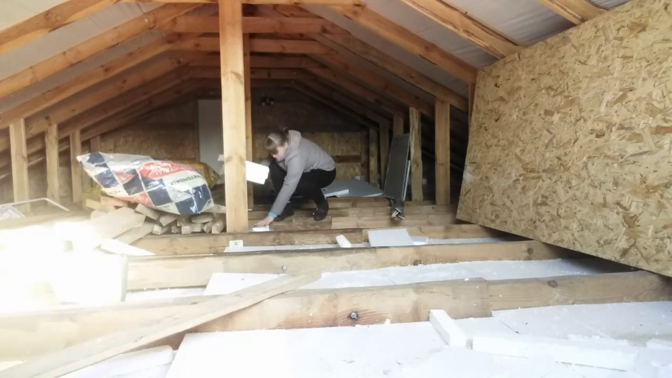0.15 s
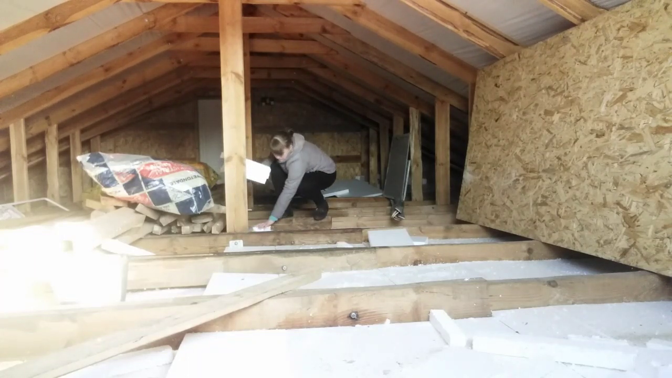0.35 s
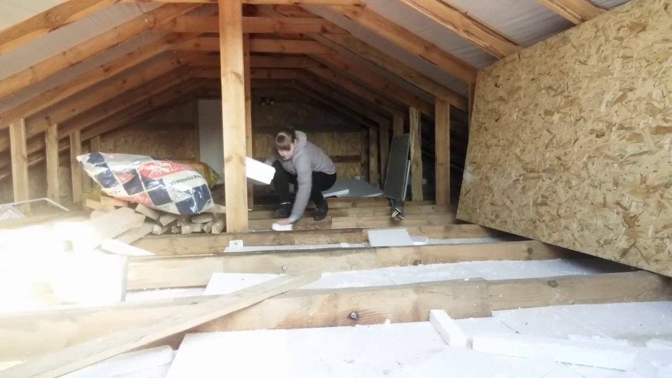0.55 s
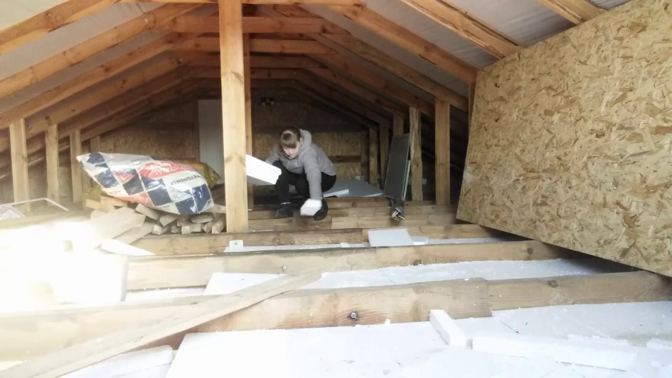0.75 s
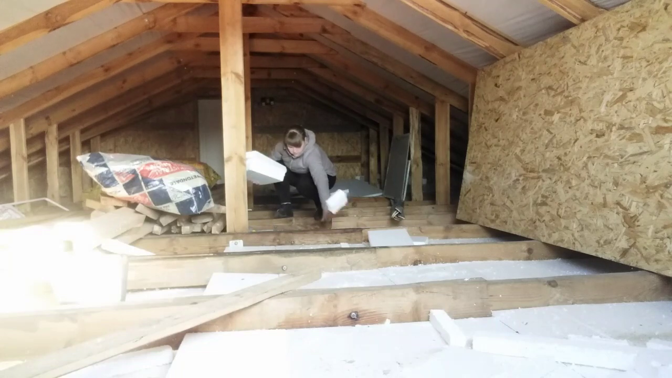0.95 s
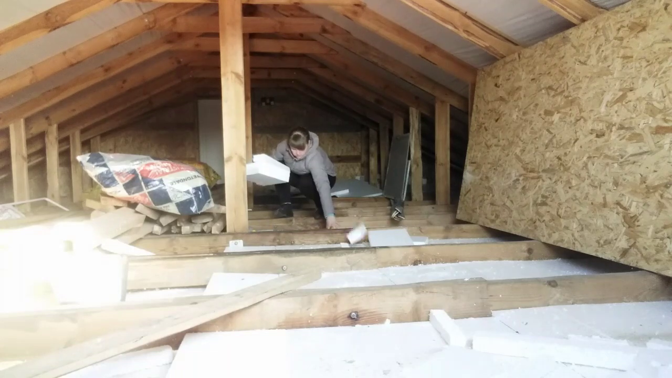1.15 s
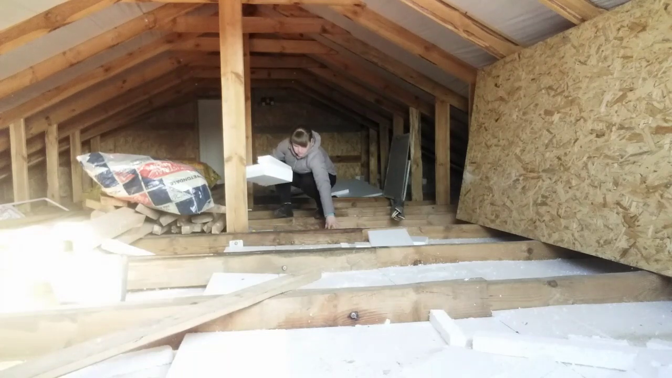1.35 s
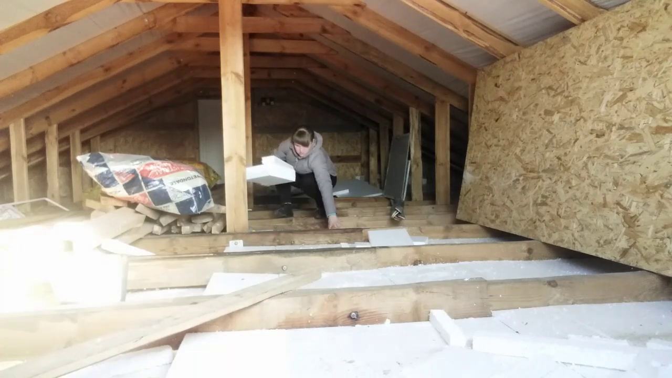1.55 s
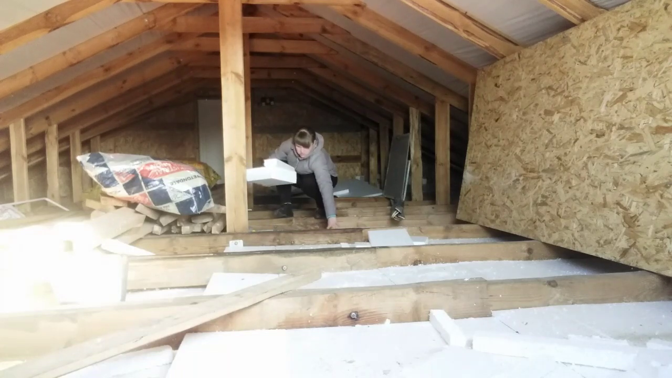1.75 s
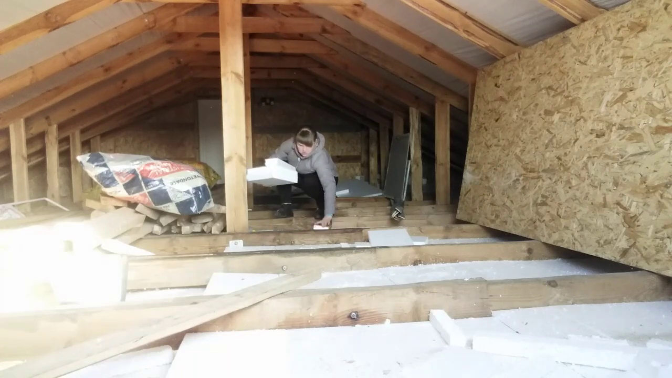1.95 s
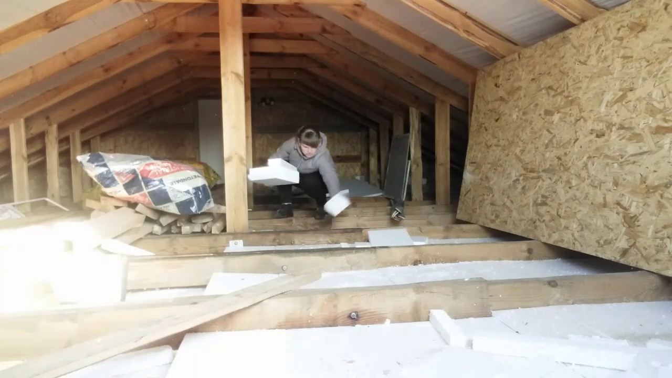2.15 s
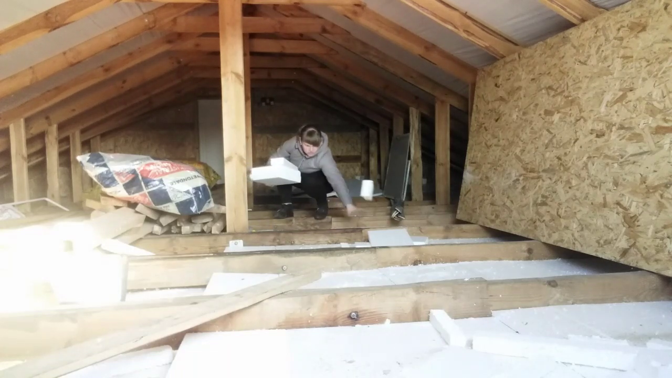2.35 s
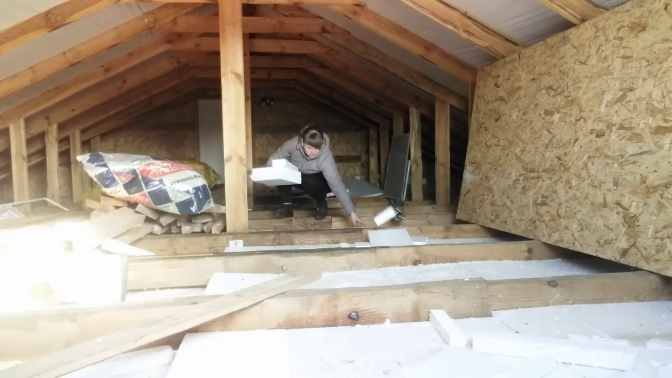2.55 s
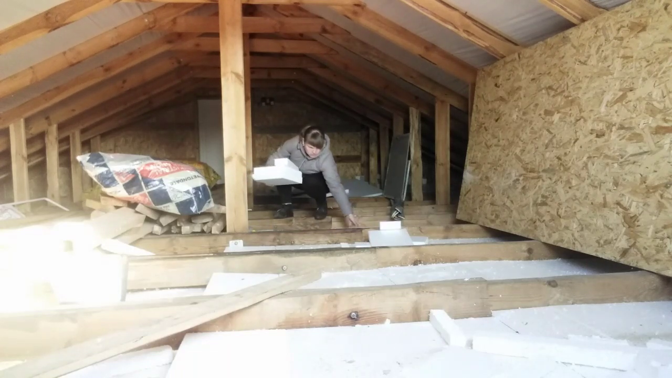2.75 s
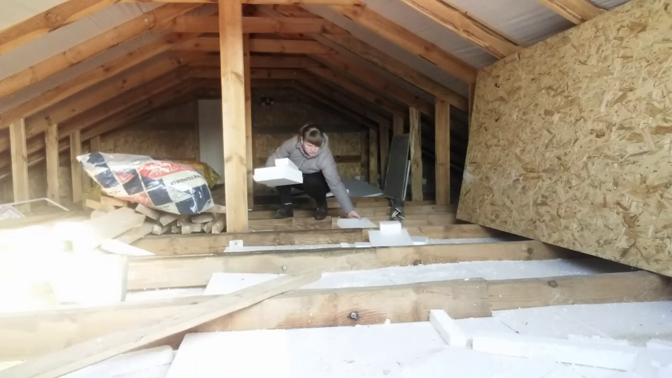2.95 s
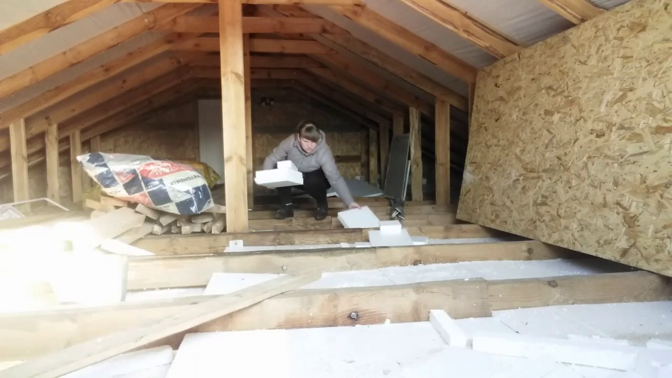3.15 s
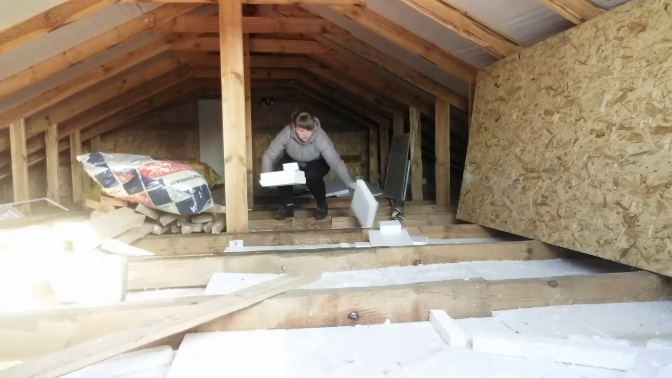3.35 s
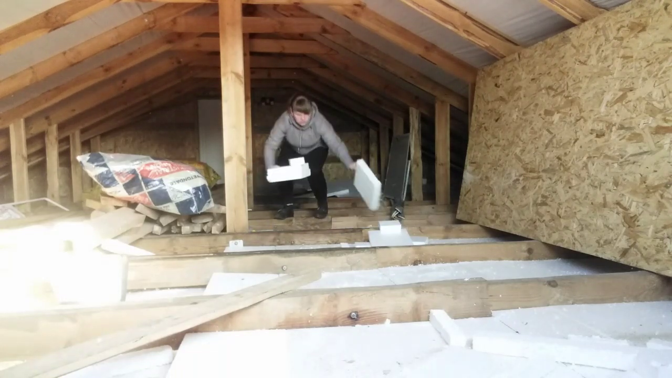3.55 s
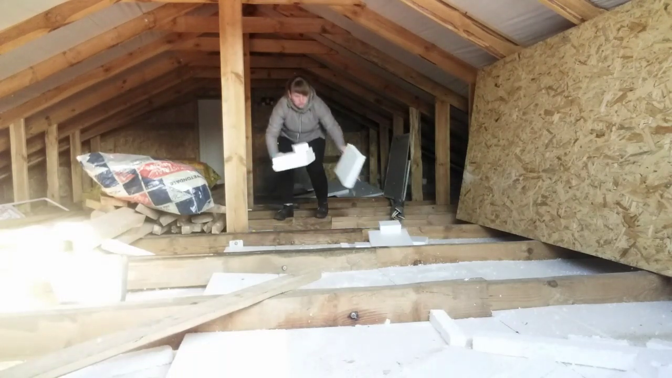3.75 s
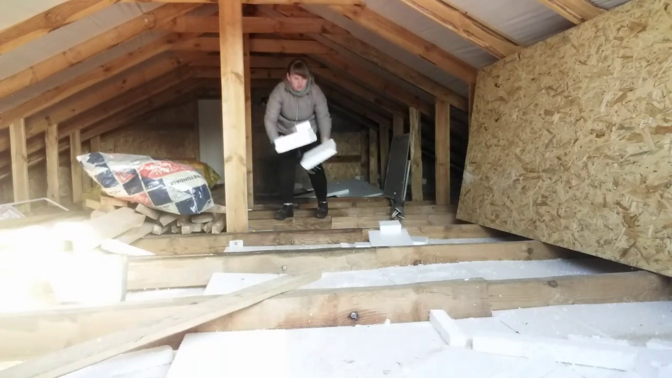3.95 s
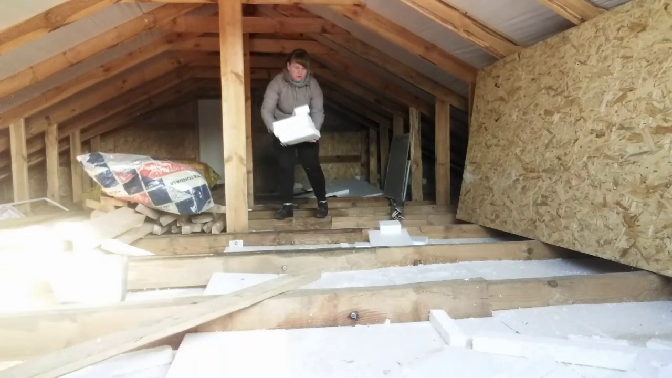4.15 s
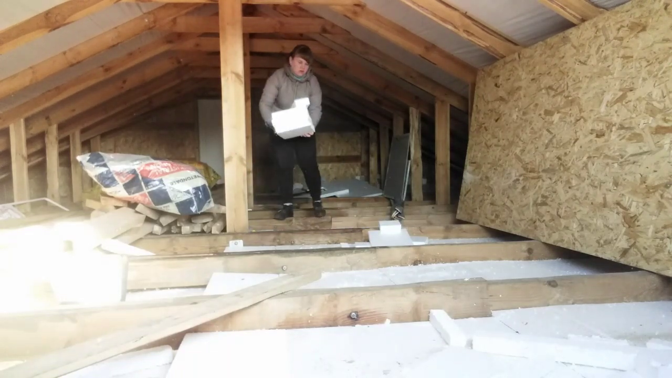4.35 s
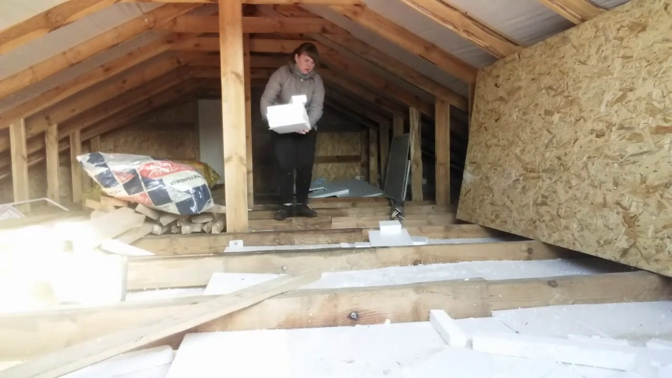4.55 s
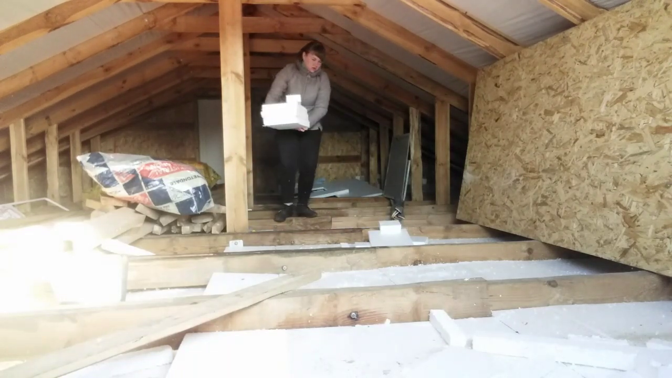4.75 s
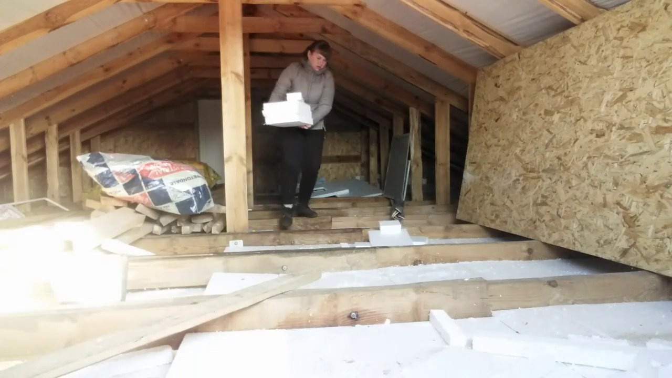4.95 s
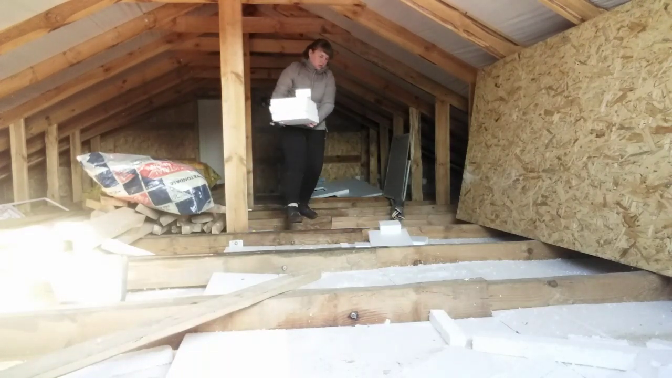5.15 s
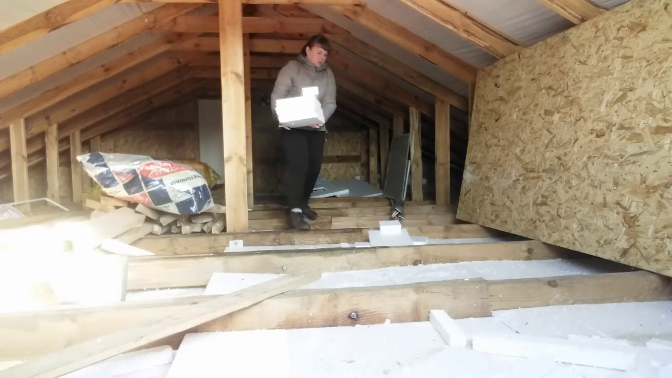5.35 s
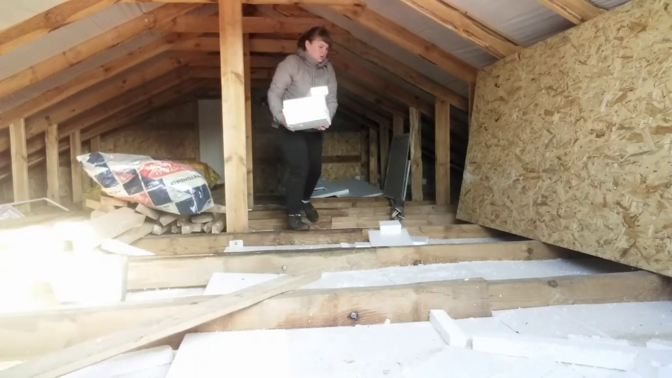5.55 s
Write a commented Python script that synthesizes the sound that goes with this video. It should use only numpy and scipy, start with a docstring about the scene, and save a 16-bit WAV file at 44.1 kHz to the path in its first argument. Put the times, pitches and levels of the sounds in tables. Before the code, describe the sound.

Someone gathers foam slabs in an attic: crisp hissing scrapes, brief squeaks, woody thumps, one flat clap, over faint hiss.

```python
"""Slabs of polystyrene foam are picked up and stacked on one arm in a small wooden attic, for 5.6 seconds.
From the start their beads stick and slip: random slips drive the hiss, rasp, drone and short dry squeaks.
Edges tick (bursts in one resonance), and slabs and feet knock on loose boards (ringing modes and noise).
From 3 s a large slab softly sounds two notes, near 3.9 s a slab claps onto the stack, and late knocks follow.
The roof answers the foam briefly; shaped noise and a high sine give a faint hiss and whine throughout."""
import sys
import numpy as np
from scipy import signal
from scipy.fft import rfft, irfft, next_fast_len
from scipy.io import wavfile
from scipy.ndimage import map_coordinates

SR = 44100
rng = np.random.default_rng(int(sys.argv[2]) if len(sys.argv) > 2 else 0)


def wav_record(signal):
    """Record a signal, one row per channel, as 16-bit PCM in the file named by sys.argv[1]."""
    frames = np.transpose(np.atleast_2d(signal))
    bounded = np.clip(frames, -1, 1)
    # unit amplitude maps onto the largest positive 16-bit level
    quanta = np.round(bounded * 32767).astype(np.int16)
    wavfile.write(sys.argv[1], SR, quanta)


N = 246951  # length in samples

# Strokes of foam on foam or wood. Each row: start in seconds, swell in seconds, hold in seconds,
# bead hiss in dB, slab rasp in dB over the hiss, hollow body in dB over the rasp.
RUB_STROKES = [(0.035, 0.012, 0.047, -56.5, -13, -20), (.119, 0.0041, 0.057, -44.5, -17.5, 2),
               (.283, 0.027, 0.015, -39, -2.5, -4.5), (.354, 0.06, 0.0088, -37.5, 0, -17),
               (.592, 0.053, 0.076, -42.5, -7.5, -21), (.805, 0.049, 0.067, -53, -7.5, -14.5),
               (.94, 0.038, 0.081, -45.5, -18.5, -15), (1.15, 0.037, 0.055, -43.5, -17, -10.5),
               (1.238, 0.03, 0.0037, -43, 2, -9.5), (1.317, 0.007, 0.056, -51, -6, -21),
               (1.709, 0.03, 0.083, -44, -6.5, -11), (2.137, 0.013, .006, -47, -13.5, -21),
               (2.622, 0.029, 0.0075, -39.5, -1.5, -4.5), (2.699, 0.0088, 0.074, -50, -3, -6),
               (2.887, .017, .02, -56.5, -10, -4), (2.972, .006, 0.038, -52.5, -11, -8),
               (3.005, 0.034, 0.12, -47, -7, -6), (3.143, 0.019, 0.022, -46, 2.5, -11.5),
               (3.393, 0.047, .016, -49, 0.5, -19.5), (3.474, 0.023, .066, -51.5, -6, -8.5),
               (3.642, .014, .041, -49.5, -15, -12), (3.688, 0.058, .009, -46, 1.5, -10.5),
               (3.865, 0.017, .045, -64, -7, -1), (4.03, 0.051, 0.13, -57, -2.5, -5),
               (4.196, .02, 0.052, -49.5, -3.5, -2.5), (4.292, 0.011, .05, -46.5, -5, -5),
               (4.337, .025, 0.057, -40, -6, -5), (4.438, 0.066, 0.058, -46, -5, -3.5),
               (4.622, 0.04, 0.069, -55, -3, -6), (4.782, 0.042, 0.044, -45, -6, -8),
               (4.885, 0.1, .058, -48.5, -4.5, -7), (5.079, .012, 0.011, -53.5, -10, -4),
               (5.14, 0.012, 0.022, -54, -12, -10), (5.218, 0.018, .035, -59, -17, -4),
               (5.358, 0.067, 0.066, -48.5, -2.5, -4), (5.519, 0.051, 0.012, -48, -8, -4.5)]
# Light brushing of the held slabs while the arm moves. Each row: start in seconds, end in seconds, hiss in dB.
LIGHT_BRUSHING = [(0.0, 1.42, -61), (2.8, 4.0, -61), (4.046, 5.12, -60), (5.148, 5.6, -67)]
# Sound of the slipping beads. Each row: frequency in Hz, relative level in dB.
BEAD_SPECTRUM = [(900, -60.5), (2200, -55), (3300, 1), (4200, 1), (5200, 0.5), (5800, 1), (6900, 4.5),
                 (7600, -2), (8600, -6.5), (9500, -22.5), (10500, -20.5), (12700, -15), (14200, -19),
                 (16000, -20)]
# Higher resonances of a foam slab. Each row: frequency in Hz, width in Hz, relative level in dB.
RASP_RESONANCES = [(1421, 177, 0.5), (1903, 315, 0), (2064, 190, 5.5), (2580, 325, 1.5), (2785, 270, 2),
                   (3560, 360, 1)]
# Lower resonances of a foam slab. Each row: frequency in Hz, width in Hz, relative level in dB.
BODY_RESONANCES = [(580, 200, -4.5), (713, 104, 0.5), (853, 134, -6.5), (1144, 200, -8.5)]
# Squeaks, quick runs of hard slips. Each row: time of the peak in seconds, relative level in dB,
# rise and fall in seconds (each the time for a change by a factor of 2.7).
SQUEAK_EVENTS = [(.178, -40.5, .002, .008), (.296, -37, .006, .01), (.313, -36, .013, 0.011),
                 (0.411, -36, .022, 0.012), (.647, -37.5, .007, .009), (.687, -35.5, .002, 0.01),
                 (0.863, -51, .008, .009), (0.994, -43.5, .007, .009), (1.27, -37.5, .012, 0.0052),
                 (1.341, -43, .0064, 0.0083), (1.722, -50.5, .002, 0.011), (2.15, -50, .002, 0.0098),
                 (2.161, -46.5, .008, 0.0099), (2.626, -34.5, .002, .012), (2.648, -31, .003, 0.0056),
                 (3.045, -43.5, .006, 0.0093), (3.112, -43.5, .007, 0.01), (3.161, -32, .003, 0.012),
                 (3.436, -42.5, .0035, 0.009), (3.749, -33, .014, 0.0053), (4.084, -46, .002, 0.0069),
                 (4.164, -45.5, .013, .005), (4.213, -33, .005, 0.011), (4.31, -40.5, .008, 0.015),
                 (4.372, -35.5, .009, 0.0062), (4.547, -42, .011, 0.011), (4.671, -49.5, .005, 0.0037),
                 (4.695, -50, .002, 0.018), (4.845, -46.5, .006, 0.01)]
# Ticks and short chirps of a slab's edge. Each row: start in seconds, relative level in dB,
# centre in Hz, width in octaves.
EDGE_TICKS = [(0.126, -26, 6540, 0.44), (.126, -42, 13300, 0.15), (0.1315, -30.5, 6650, 0.32),
              (0.137, -46, 1530, 0.042), (0.172, -43, 3130, 0.15), (0.177, -34.5, 6630, 0.55),
              (0.3, -36, 1456, 0.058), (0.402, -34.5, 2054, 0.06), (0.596, -43, 6500, 0.24),
              (0.6852, -31, 6400, .7), (2.155, -45, 4740, 0.076), (2.16, -50.5, 3500, 0.048),
              (2.154, -61, 1370, 0.039), (2.975, -45, 7000, 0.23), (3.412, -40, 6060, 0.38),
              (3.6585, -40, 6650, 0.23), (3.9404, -44, 6360, 0.26), (4.082, -47, 6450, 0.3),
              (5.22, -47, 6640, 0.22)]
# Notes of the large slab. Each row: frequency in Hz, width in Hz, relative level in dB.
LARGE_SLAB_NOTES = [(730, 110, 0), (1400, 90, 0.5)]
# Slabs and feet knocking on the floor. Each row: start in seconds, relative level in dB, lowest Hz, highest Hz,
# note of the struck board in Hz, that note's relative level in dB over the knock.
FLOOR_KNOCKS = [(0.123, -39, 124, 640, 268, -6), (0.178, -36, 116, 654, 343, 2),
                (0.296, -48, 65, 460, 146, -7), (0.346, -46.5, 150, 420, 308, 0.5),
                (0.396, -48.5, 69.4, 418, 308, -6), (1.259, -31, 215, 750, 491, -2),
                (1.276, -49, 70, 260, 205, 6.5), (1.301, -38, 159, 550, 343, -0.5),
                (2.623, -48, 129, 635, 268, -9), (2.643, -31, 240, 720, 146, 1),
                (2.665, -40, 90, 620, 268, -3), (2.975, -62.5, 70, 169, 146, 0.5),
                (3.154, -58.5, 70, 310, 146, -1), (3.942, -54.5, 276, 970, 113, -9),
                (4.345, -54, 277, 650, 113, -5), (4.507, -49, 65.4, 260, 81, -1),
                (4.548, -48.5, 60, 200, 127, -3.5), (4.681, -56, 60, 177, 127, -14),
                (5.377, -36.5, 119, 700, 308, -1.5), (5.389, -46, 130, 260, 205, 7),
                (5.402, -37, 48, 101, 113, 5), (5.525, -44, 50, 190, 127, -3)]
# Ringing modes of the boarded floor. Each row: frequency in Hz, relative level in dB before random
# variation, time to fall by 60 dB in seconds.
FLOOR_MODES = [(51.6, -1, 0.29), (61.5, 2, 0.53), (84, -5, 0.45), (98.5, 2, 0.53), (111.4, -12, .32),
               (126.9, -0.5, 0.62), (146.9, 4, 0.38), (183.2, -2.5, 0.52), (206.4, -5, 0.32),
               (264.3, -6.5, 0.52), (309.2, 1.5, 0.27), (338, 4.5, 0.14), (398, -0.5, 0.14),
               (454.1, 0, 0.24), (496, -6.5, 0.21), (518, -14.5, 0.23), (562.5, -6.5, 0.193),
               (579, -30, .3), (706, -3.5, 0.32), (750, -12, 0.19), (847, -8, 0.3), (915, -12, 0.13)]
# Full echo of the attic. Each row: frequency in Hz, time to fall by 60 dB in seconds; each sound uses a share.
ATTIC_RING = [(100, 1), (500, 0.25), (2000, 0.27), (7000, 0.14), (15000, 0.092)]
# Early reflections off the floor, the post and the sloping roof. Each row: delay in seconds, level in dB.
EARLY_REFLECTIONS = [(.0021, -21.5), (.0037, -28), (.0061, -18), (.0083, -19), (.0119, -14), (.0157, -21)]
# Steady background noise. Each row: frequency in Hz, relative level in dB.
HISS_SPECTRUM = [(20, -17), (60, 12.5), (130, 12), (220, 0.5), (500, -5), (1000, -10), (2500, -12),
                 (5500, -12), (6400, -1), (7100, -1), (8200, -13), (9600, -20), (13000, -17.5),
                 (16000, -10.5)]
# Thin electronic whine. Each row: frequency in Hz, level in dB.
WHINE_TONE = [(14863, -74)]

# T60 is the time in which a sound falls by 60 dB.
RELEASE_DB_PER_S = 224.5  # every stroke dies away alike
CARRY_RASP_DB, CARRY_BODY_DB = -10, -11  # light brushing: rasp over its hiss, body over its rasp
SQUEAK_SLIPS_PER_S, SHARP_RISE_S, SLOW_RISE_POWER = 1100, .002, .24  # a slower rise slips slower
TICK_T60_OCTAVE_S = 0.0082  # T60 of a tick one octave wide; narrower ones ring longer
CLAP_S, CLAP_DB, CLAP_HZ, CLAP_OCTAVES, CLAP_T60_S = 3.9412, -22.5, 1900, .6, 0.007  # time, then its crack
CLAP_ECHO_DB, CLAP_ECHO_HZ, CLAP_ECHO_OCTAVES, CLAP_ECHO_T60_S = -19, 1700, .62, 0.19  # dB over the crack
SLAB_HELD_S, SLAB_HELD_FOR_S, SLAB_HUM_DB = 3.0, 1.87, -69  # start, hold after the swell, level
SHUDDER_T60_S, SHUDDER_AT_HZ, SHUDDER_POWER = 0.48, 122, 0.97  # T60 of a blow reaching down to this pitch
LONGEST_SHUDDER_S = 0.58  # T60 of the deepest blows
TOP_HZ = 15830  # nothing is kept from here up


def amp(db):
    """Turn decibels into gain."""
    return 10 ** (np.asarray(db) / 20)


def unit(x):
    """Scale a sound to an average (rms) strength of 1."""
    return x / np.sqrt(np.mean(x ** 2) + 1e-20)


def along(points, hz):
    """Read values between (Hz, value) points, with frequency on a log scale."""
    point_hz, values = np.transpose(points)
    return np.interp(np.log(hz + 1), np.log(point_hz), values)


def fade(t, t60):
    """Die away exponentially, by 60 dB in t60 seconds."""
    return np.exp(-np.log(1000) * t / t60)


def wobble(rate, size):
    """Draw a smooth curve through random points, rate points a second."""
    points = rng.standard_normal(int(size * rate / SR) + 4)
    return map_coordinates(points, [np.arange(size) * rate / SR])


def filtered(x, response):
    """Multiply the spectrum of a sound by a gain that depends on frequency."""
    padded = next_fast_len(len(x) + 8192)
    gain = response(np.fft.rfftfreq(padded, 1 / SR))
    return irfft(rfft(x, padded) * gain, padded)[:len(x)]


def coloured(x, spectrum):
    """Shape a sound by a table of (Hz, dB)."""
    return filtered(x, lambda hz: amp(along(spectrum, hz)))


def band(hz, low_hz, high_hz):
    """Gain that passes a band and falls steeply on both sides."""
    below = 1 + (low_hz / (hz + 1)) ** 8
    above = 1 + (hz / high_hz) ** 8
    return 1 / np.sqrt(below * above)


def resonant(x, modes, low_hz, high_hz):
    """Ring a row of resonances that radiate only inside a band."""
    def response(hz):
        total = 0
        for k, (centre, width, db) in enumerate(modes):
            peak = 1j * hz * width / (centre * centre - hz * hz + 1j * hz * width)
            total = total + (-1) ** k * amp(db) * peak  # neighbours have opposite signs
        return total * band(hz, low_hz, high_hz)
    return filtered(x, response)


def add(track, s, sound):
    """Mix a sound into the track from time s on."""
    start = max(round(s * SR), 0)
    track[start:start + len(sound)] += sound[:N - start]


def attic(x, wet_db, length):
    """Add echoes off roof and rafters, so many that only their power adds; length is a share of the full ring."""
    hop = 64
    hz, _, direct = signal.stft(x, SR, nperseg=2 * hop)
    keep = fade(hop / SR, length * along(ATTIC_RING, hz)) ** 2  # power left after each step
    power = np.array([signal.lfilter([0, 1 - k], [1, -k], np.abs(row) ** 2) for k, row in zip(keep, direct)])
    scatter = signal.stft(rng.standard_normal(N), SR, nperseg=2 * hop)[2]
    echo = signal.istft(scatter * np.sqrt(power), SR, nperseg=2 * hop)[1][:N]
    echo = unit(echo) * np.std(x)
    return (x + amp(wet_db) * echo) / np.hypot(1, amp(wet_db))


def stroke(t, swell, hold):
    """The strength of a stroke swells, holds and dies away."""
    since_release = np.maximum(t - swell - hold, 0)
    return np.clip(t / swell, 0, 1) * amp(-RELEASE_DB_PER_S * since_release)


def slips(rate, wander, scatter_db, dust, size):
    """Stick-slip pulses of uneven pace and strength, over the fine friction of many beads."""
    pace = rate * np.exp(wander * (wobble(40, size) + wobble(400, size)))
    slipped = np.diff(np.floor(np.cumsum(pace) / SR), prepend=0) > 0
    strength = amp(scatter_db * np.clip(rng.standard_normal(size), -2, 2))
    return unit(unit(slipped * strength) + dust * rng.standard_normal(size))


def rubbing():
    """One stream of slips makes the beads hiss, the slab rasp and its body drone; light touch hisses finer."""
    t = np.arange(N) / SR
    contacts = list(RUB_STROKES)
    for start, end, db in LIGHT_BRUSHING:
        contacts.append((start, .01, end - start, db, CARRY_RASP_DB, CARRY_BODY_DB))
    power = np.zeros((3, N))
    for start, swell, hold, db, rasp_db, body_db in contacts:
        shape = stroke(t[:int((swell + hold + .3) * SR)], swell, hold)
        levels_db = np.cumsum([db, rasp_db, body_db])  # each level stands on the one before
        for track, level_db in zip(power, levels_db):
            add(track, start, (amp(level_db) * shape) ** 2)
    hiss, rasp, body = np.sqrt(power)
    grip = amp(0.98 * wobble(90, N))  # catches and eases
    drive = grip * slips(rate=800, wander=.45, scatter_db=1, dust=0.53, size=N)
    grain = unit(coloured(drive, BEAD_SPECTRUM))
    coarse = filtered(grain, lambda hz: band(hz, 500, 4450))
    # Hard rubbing drags whole clumps of beads.
    pressure = np.clip(rasp / (hiss + amp(-89.0)), 0, .7)
    beads = hiss * (grain - coarse + 1.55 * pressure ** 0.56 * coarse)
    slab = amp(-0.5) * rasp * unit(resonant(drive, RASP_RESONANCES, low_hz=1120, high_hz=3770))
    drone = amp(-0.5) * body * unit(resonant(drive, BODY_RESONANCES, low_hz=393, high_hz=1390))
    return attic(beads, wet_db=3, length=0.18) + attic(slab, wet_db=-4.0, length=0.19) + drone


def squeaks():
    """Pressed harder, the beads let go in a short run of slips at a more even pace."""
    track = np.zeros(N)
    t = np.arange(SR // 5) / SR - .06  # the peak is at zero
    for s, db, rise, fall in SQUEAK_EVENTS:
        rate = SQUEAK_SLIPS_PER_S * (SHARP_RISE_S / rise) ** SLOW_RISE_POWER
        drive = slips(rate=rate, wander=.2, scatter_db=1.5, dust=0.54, size=len(t))
        beads = unit(coloured(drive, BEAD_SPECTRUM))
        slab = unit(resonant(drive, RASP_RESONANCES, low_hz=1150, high_hz=4000))
        shape = np.exp(np.minimum(t / rise, -t / fall))
        add(track, s + t[0], amp(db + 1.0) * (beads + amp(-12.5) * slab) * shape)
    return attic(track, wet_db=-6.5, length=0.86)


def crack(centre_hz, octaves, t60):
    """A burst of noise that dies away in one resonance; a wider one starts faster."""
    t = np.arange(SR // 4) / SR

    def bell(hz):
        distance = np.log2((hz + 1) / centre_hz) / octaves
        return np.exp(-.5 * distance ** 2) * band(hz, 150, 8400)

    burst = unit(filtered(rng.standard_normal(len(t)), bell))
    return burst * fade(t, t60) * (1 - np.exp(-t * centre_hz * octaves))


def ticks():
    """An edge snaps free or taps the wood: a brief crack in one resonance, a chirp when that is narrow."""
    track = np.zeros(N)
    for s, db, centre_hz, octaves in EDGE_TICKS:
        add(track, s, amp(db + 2.0) * crack(centre_hz, octaves, TICK_T60_OCTAVE_S / octaves))
    return attic(track, wet_db=-7.5, length=0.94)


def clap():
    """A slab lands flat on the stack with a short crack, and the roof answers with a longer one."""
    track = np.zeros(N)
    answer = crack(CLAP_ECHO_HZ, CLAP_ECHO_OCTAVES, CLAP_ECHO_T60_S)
    add(track, CLAP_S, amp(CLAP_DB) * crack(CLAP_HZ, CLAP_OCTAVES, CLAP_T60_S))
    add(track, CLAP_S + 0.0022, amp(CLAP_DB + CLAP_ECHO_DB) * answer)
    return attic(track, wet_db=-3, length=0.93)


def slab_hum():
    """Fingers creeping on the large slab slip and keep its two notes sounding."""
    track = np.zeros(N)
    t = np.arange(int((SLAB_HELD_FOR_S + .3) * SR)) / SR
    drive = slips(rate=600, wander=.45, scatter_db=5, dust=0.63, size=len(t))
    hum = unit(resonant(drive, LARGE_SLAB_NOTES, low_hz=556, high_hz=1590))
    add(track, SLAB_HELD_S, amp(SLAB_HUM_DB) * hum * stroke(t, 0.066, SLAB_HELD_FOR_S))
    return track


def knocks():
    """A blow rings the floor's modes and the struck board's note, over a noisy tail that lasts longer if deep."""
    track = np.zeros(N)
    t = np.arange(int(.7 * SR)) / SR
    mode_hz, mode_db, mode_t60 = np.transpose(FLOOR_MODES)[:, :, None]
    for s, db, low_hz, high_hz, board_hz, board_db in FLOOR_KNOCKS:
        varied_db = mode_db + rng.standard_normal(mode_db.shape)
        shares = amp(varied_db) * band(mode_hz, low_hz, high_hz)
        gains = amp(db + 3) * shares / np.linalg.norm(shares)
        # The mode nearest the struck board's note gets its own level.
        gains[np.argmin(np.abs(mode_hz - board_hz))] = amp(db + board_db + 5.0)
        phases = rng.uniform(0, 2 * np.pi, mode_hz.shape)
        tones = np.sin(2 * np.pi * mode_hz * t + phases)
        ring = np.sum(gains * tones * fade(t, mode_t60), axis=0)
        t60 = min(SHUDDER_T60_S * (SHUDDER_AT_HZ / low_hz) ** SHUDDER_POWER, LONGEST_SHUDDER_S)
        noise = filtered(rng.standard_normal(len(t)), lambda hz: band(hz, low_hz, high_hz) ** 2)
        shudder = unit(noise) * fade(t, t60)
        onset = 1 - np.exp(-t / 0.0025)
        add(track, s, (ring + amp(db - 1.5) * shudder) * onset)
    return track


def walls(x):
    """Weak early copies that comb the spectrum of the foam sounds, at an unchanged overall level."""
    out = x.copy()
    for delay, db in EARLY_REFLECTIONS:
        add(out, delay, amp(db) * x)
    return unit(out) * np.std(x)


def background():
    """Shaped noise for room rumble and microphone hiss, and a slightly wavering sine for the electronic whine."""
    hz, db = WHINE_TONE[0]
    phase = 2 * np.pi * np.cumsum(hz + 3 * wobble(28, N)) / SR
    whine = amp(db) * np.sqrt(2) * np.sin(phase)
    hiss = amp(-70.5) * unit(coloured(rng.standard_normal(N), HISS_SPECTRUM))
    return hiss + whine


def scene():
    """Everything as it reaches one microphone."""
    foam = walls(rubbing() + squeaks() + ticks() + clap() + slab_hum())
    return (foam + knocks() + background())[None]


def record(dry):
    """The recorder sheds the deepest bass and keeps nothing above its band limit."""
    low_cut = signal.butter(3, 42, "highpass", fs=SR, output="sos")
    without_bass = signal.sosfilt(low_cut, dry)
    return np.array([filtered(channel, lambda hz: hz < TOP_HZ) for channel in without_bass])


dry = scene()
out = record(dry)
wav_record(out)
```